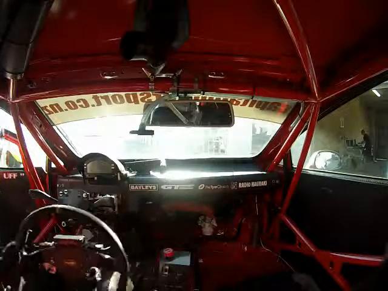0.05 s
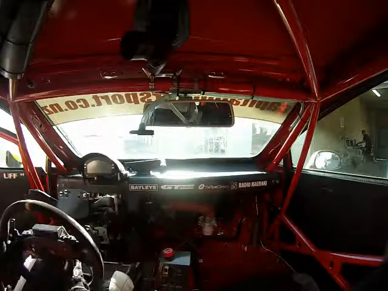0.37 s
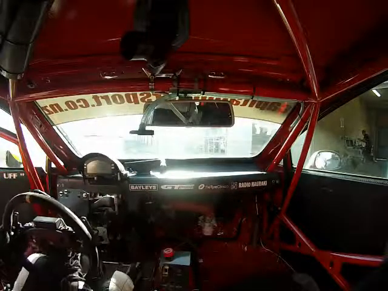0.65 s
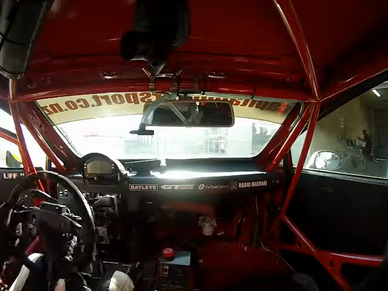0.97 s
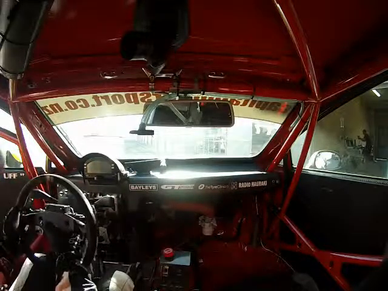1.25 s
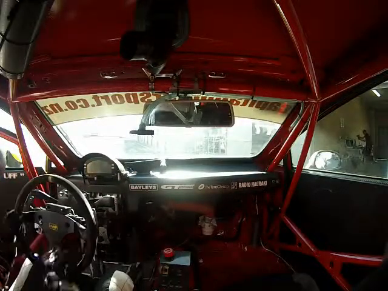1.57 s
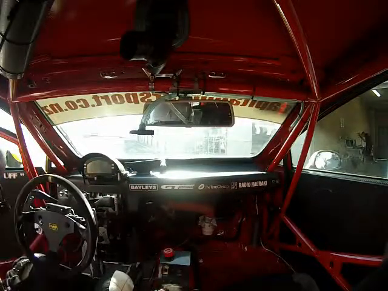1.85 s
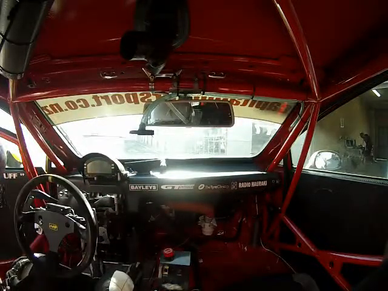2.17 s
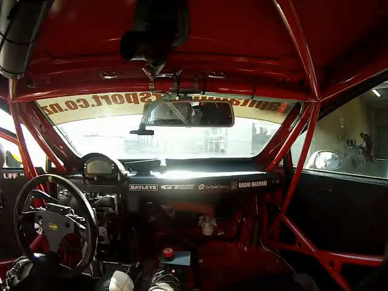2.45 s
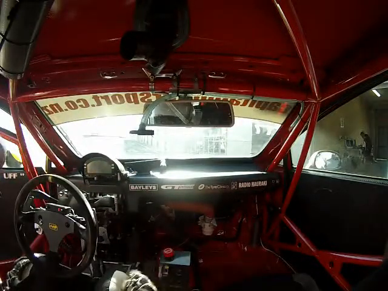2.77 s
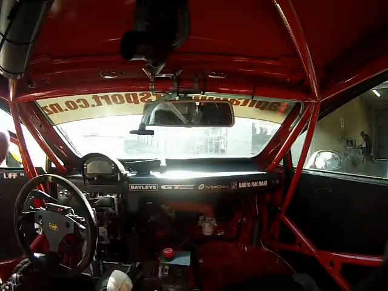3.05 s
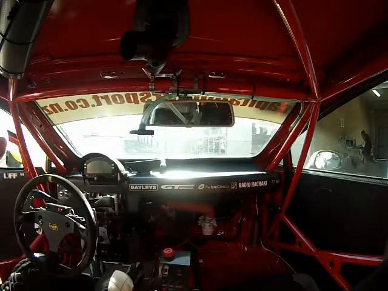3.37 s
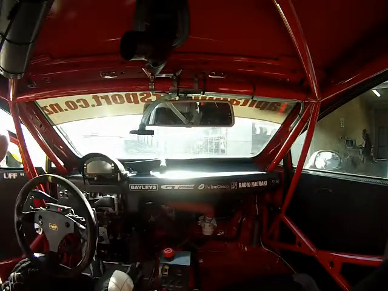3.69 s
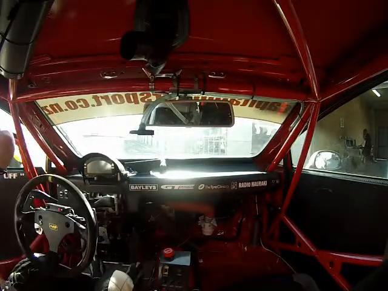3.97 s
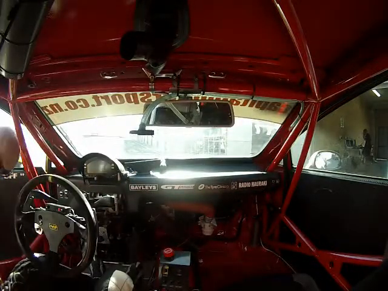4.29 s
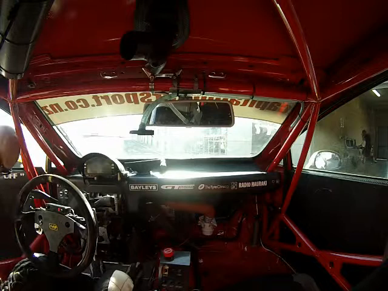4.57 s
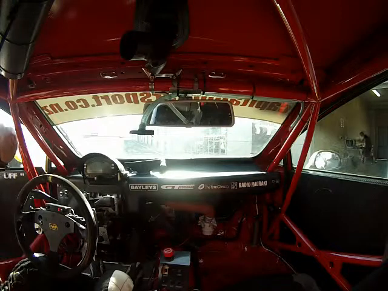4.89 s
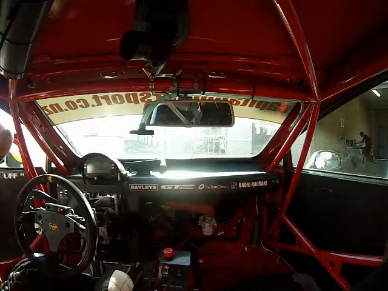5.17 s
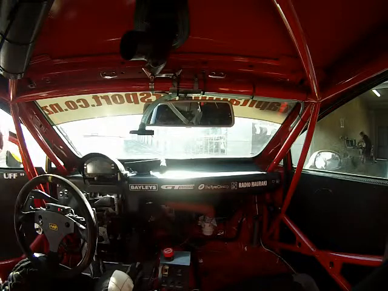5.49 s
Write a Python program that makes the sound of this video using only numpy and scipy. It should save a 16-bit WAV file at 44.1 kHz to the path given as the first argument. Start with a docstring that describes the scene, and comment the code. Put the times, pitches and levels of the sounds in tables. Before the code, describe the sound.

Sharp metal knocks and clicks with hollow, booming thuds in a bare car cabin, then a lull and one ringing clank.

```python
"""Inside a race car parked in a garage, heard from the cabin on an almost mono microphone.
A quick-release steering wheel is knocked onto its column until its collar snaps home; the hollow
column and the bare body shell boom. Fittings click, springs snap, gloves rub the rim, and a last
clank of a lever leaves a thin steel part ringing. The small, hard cabin answers the blows with
short reflections, over the quiet air of the garage outside."""
import sys
import numpy as np
from scipy import signal
from scipy.fft import rfft, irfft
from scipy.io import wavfile
from scipy.ndimage import uniform_filter1d

SR = 44100
rng = np.random.default_rng(int(sys.argv[2]) if len(sys.argv) > 2 else 0)


def transcribe(signal):
    """Save signal, clipped to [-1, 1], as a 16-bit WAV file at the path in sys.argv[1]."""
    frames = np.atleast_2d(signal).T
    limited = np.clip(frames, -1, 1)
    pcm = np.round(limited * 32767).astype(np.int16)
    wavfile.write(sys.argv[1], SR, pcm)


N = 248264
T = np.arange(N) / SR  # scene time [s]
AGE = T[:SR]  # time since a blow [s], one second long


# Hub striking the column: (time [s], relative knock level [dB], relative column level [dB])
HUB_KNOCKS = [(0.315,-31.5,-37.5), (0.737,-15,-58), (0.742,-17,-16.5), (0.78,-19.5,-20.5),
              (0.799,-14.5,-34), (0.808,-21,-19), (0.84,-28.5,-38), (1.111,-7.5,-8), (1.2136,-19.5,-18.5),
              (1.222,-21.5,-23), (1.256,-6.5,-10), (1.265,-14,-15.5), (1.531,-35,-30), (1.62,-29,-13.5),
              (1.632,-17,-17), (2.404,-16.5,-28), (2.436,-15,-30.5)]
# Modes of the hub: (frequency [Hz], level [dB], t60 [s])
HUB_MODES = [(660, -5, .06), (790, -5, .06), (930, -4, .06), (1085, 0, .07), (1160, -2, .05),
             (1290, -4, .05), (1480, -9, .05), (2000, -11, .06), (2260, -6, .06), (2700, -13, .08),
             (3020, -20, .06)]
# Spectrum of the hub's contact: (frequency [Hz], level [dB])
KNOCK_SPECTRUM = [(200, -21.5), (450, -2.5), (1100, 3.5), (1650, -12), (2400, -17.5), (3400, -27),
                  (5000, -63.5)]
def hub_knocks():
    """The hub hunts for its splines: each blow rings it, scrapes steel and shakes column and shell."""
    out = np.zeros(N)
    for s, db, column_db in HUB_KNOCKS:
        hub = cabin(ring(HUB_MODES, scatter_db=0), wet_db=-4, t60=.12)
        hub = confine(hub, low_hz=553, high_hz=3060)
        contact = crack(KNOCK_SPECTRUM, t60=.05, tail_db=-8, tail_t60=.15)
        add(out, s, undb(db - 19) * (hub + contact))
        add(out, s, undb(db - 50) * spline_scrape())
        add(out, s + .00238, undb(column_db - 3) * column())
        thump = confine(ring(SHELL_MODES, scatter_db=2), low_hz=29.8, high_hz=160)
        add(out, s, undb(column_db - 10) * thump)
    return out


# Modes of the steering column: (frequency [Hz], level [dB], t60 [s])
COLUMN_MODES = [(258.95, -0.5, 0.33), (280.6, 0, 0.28), (339.5, -4, 0.12), (390.3, -4.5, 0.16),
                (503.8, -12.5, 0.22), (523.6, -19, 1)]
# Spectrum of the dash's thud: (frequency [Hz], level [dB])
DASH_SPECTRUM = [(120, -10.5), (185, -24.5), (255, -1.5), (350, -3), (450, -10.5), (520, -5.5), (600, -34),
                 (900, -15.5), (2000, -76)]
def column():
    """The hollow note of the column, with the looser thud of the dash around it."""
    note = confine(ring(COLUMN_MODES, scatter_db=2), low_hz=190, high_hz=705)
    thud = crack(DASH_SPECTRUM, t60=.05, tail_db=-13, tail_t60=.33)
    return unit_energy(note + undb(-3.5) * thud)


# Spectrum of steel on steel: (frequency [Hz], level [dB])
SCRAPE_SPECTRUM = [(2000, -12), (3500, 2), (4800, 2.5), (5700, -3), (6600, -2.5), (8000, -8), (10000, -26),
                   (12500, -23.5), (15000, -48)]
def spline_scrape():
    """Steel grazes steel on the splines in a short, bright rasp."""
    return crack(SCRAPE_SPECTRUM, t60=.05, tail_db=7, tail_t60=.15)


# Hands shoving the column: (time of full force [s], hold [s], level [dB])
COLUMN_SHOVES = [(0.0, 0.008, -41.5), (0.193, 0.025, -41), (0.35, 0.082, -40), (0.793, 0.13, -21.5),
                 (1.142, 0.19, -18), (1.433, 0.041, -21.5), (1.645, 0.019, -16.5), (1.85, 0.015, -30.5),
                 (2.25, 0.49, -39.5), (2.986, 0.046, -43.5)]
# Modes of the bare shell around the microphone: (frequency [Hz], level [dB], t60 [s])
SHELL_MODES = [(39.1, 0, 0.61), (54.7, -8, 1), (69.1, 1.5, 0.67), (85, -0.5, 0.57), (108.2, -4, 0.8),
               (144, -10, 0.15)]
def shell_boom():
    """Each shove builds quickly, holds and dies away, keeping the shell booming in its lowest modes."""
    rise_db_per_s, fall_db_per_s = 339.5, 82
    response = confine(ring(SHELL_MODES, scatter_db=1), low_hz=29.5, high_hz=113.7)
    boom = signal.fftconvolve(rng.standard_normal(N + SR - 1), response, "valid")
    boom /= np.sqrt(uniform_filter1d(boom ** 2, size=4000))  # evened out, so the shoves set the level
    force_db = [db - rise_db_per_s * np.maximum(s - T, 0) - fall_db_per_s * np.maximum(T - s - hold, 0)
                for s, hold, db in COLUMN_SHOVES]
    return boom * undb(np.max(force_db, axis=0))


# The collar locking: (time [s], relative crash level [dB], crash t60 [s], ring level [dB],
# hum level [dB], scrape level [dB])
COLLAR_LOCKS = [(1.257, -19.5, 0.059, -62, -34.5, -66), (1.6181, -13.5, 0.1, -30.5, -25.5, -34.5)]
# Spectrum of the collar's crash: (frequency [Hz], level [dB])
CRASH_SPECTRUM = [(450, -15), (750, 5.5), (1130, 9.5), (1500, -1), (2250, 5), (3400, -16.5), (4750, -11.5),
                  (5700, -17.5), (6600, -16), (9500, -26.5), (12000, -35.5), (15000, -51)]
# Modes of the steel collar and of the wheel: (frequency [Hz], level [dB], t60 [s])
COLLAR_MODES = [(1680, -6, .12), (1920, -5, .1), (2239, -4, .11), (2729, -6, .13), (2912, -8, .2),
                (3252, -10, .12), (4716, -8, .12), (5020, -15, .18), (6632, -13, .11), (11570, -20, .09),
                (11740, -18, .09), (11890, -16, .11), (12090, -16, .08), (12810, -23, .08)]
WHEEL_MODES = [(345, 0, 1.1), (536, -15, 1.0)]
def collar_locks():
    """The collar crashes shut, rings brightly and leaves the wheel humming."""
    out = np.zeros(N)
    for s, crash_db, crash_t60, ring_db, hum_db, scrape_db in COLLAR_LOCKS:
        crash = crack(CRASH_SPECTRUM, t60=crash_t60, tail_db=-27, tail_t60=.33)
        add(out, s, undb(crash_db - 7) * crash)
        add(out, s, undb(ring_db) * ring(COLLAR_MODES, scatter_db=2))
        add(out, s, undb(scrape_db) * spline_scrape())
        add(out, s, undb(hum_db) * ring(WHEEL_MODES, scatter_db=0))
    return out


# Small fittings clicking: (time [s], relative click level [dB], relative edge level [dB])
FITTING_CLICKS = [(0.421, -42.5, -71), (1.898, -25, -54), (1.909, -26, -67.5), (1.946, -16.5, -49),
                  (2.357, -20, -77), (2.368, -11, -73), (2.393, -1.5, -40.5), (2.56, -8.5, -41.5),
                  (2.937, -39, -69), (3.054, -40, -58.5), (3.174, -36, -67), (3.211, -41, -59),
                  (4.092, -48, -70), (4.202, -41.5, -75), (4.543, -46.5, -69)]
# Modes of a fitting: (frequency [Hz], level [dB], t60 [s])
FITTING_MODES = [(800, -9, .03), (910, -5, .045), (1120, 0, .035), (1230, 0, .03), (1350, -4, .028),
                 (1650, -13, .02), (2000, -10, .03), (2320, -12, .025), (2700, -21, .03), (3250, -25, .025)]
# Spectrum of a click's bright edge: (frequency [Hz], level [dB])
EDGE_SPECTRUM = [(2000, -26), (3500, 15), (4200, -16), (4900, 2.5), (5600, -18.5), (6250, 4), (7300, -22),
                 (11000, -25.5), (15000, -41)]
def fitting_clicks():
    """Small damped parts clack against their stops; a soft contact has little edge and sounds duller."""
    out = np.zeros(N)
    for s, db, edge_db in FITTING_CLICKS:
        top_hz = np.interp(edge_db, [-72, -52], [1550, 2500])
        clack = cabin(ring(FITTING_MODES, scatter_db=2), wet_db=-3, t60=.12)
        add(out, s, undb(db - 14.5) * confine(clack, low_hz=620, high_hz=top_hz))
        add(out, s, undb(edge_db - 6) * crack(EDGE_SPECTRUM, t60=.015, tail_db=-3, tail_t60=.15))
        add(out, s + .0029, undb(db - 24.5) * column())
    return out


# A lever touching, then hitting its stop: (time [s], level [dB], column level [dB])
LEVER_CLANKS = [(5.2324, -21, -36), (5.2350, -19, -31)]
# Modes of the lever: (frequency [Hz], level [dB], t60 [s])
LEVER_MODES = [(502, -2, .12), (930, -2, .09), (1068, -2, .08), (1274, -1, .06), (1417, 1, .055),
               (1530, -11, .06), (1603, -9, .07), (2225, -15, .08), (2305, -9, .06), (2806, -4, .16),
               (2912, -16, .12), (3170, -18, .06), (3476, -22, .07), (3567, -20, .12), (3915, -22, .05)]
# Spectrum of the lever's contact: (frequency [Hz], level [dB])
CLANK_SPECTRUM = [(500, -17), (900, -3.5), (1400, 5), (1900, -11.5), (2700, 0), (3300, -20), (3900, -29.5),
                  (4400, -37), (5600, -46), (6300, -26.5), (8000, -48.5), (15000, -67)]
def lever_clanks():
    """A steel lever lands hard, ringing briefly and sounding the column."""
    out = np.zeros(N)
    for s, db, column_db in LEVER_CLANKS:
        steel = cabin(ring(LEVER_MODES, scatter_db=2), wet_db=-6, t60=.073)
        steel = confine(steel, low_hz=655, high_hz=4270)
        contact = crack(CLANK_SPECTRUM, t60=.049, tail_db=-11, tail_t60=.17)
        add(out, s, undb(db) * (steel + undb(-7.5) * contact))
        add(out, s, undb(column_db) * column())
    return out


# Spring catches letting go: (time [s], relative tick level [dB], relative body level [dB])
SPRING_SNAPS = [(2.2036, -27.5, -34.5), (2.2342, -44, -38), (2.2423, -34.5, -43.5), (2.589, -34, -32.5),
                (2.591, -26.5, -31.5), (2.7036, -58, -52.5)]
# Spectra of a snap's treble tick and midrange body: (frequency [Hz], level [dB])
TICK_SPECTRUM = [(2000, -31), (3600, -4.5), (4300, -8.5), (5150, 4.5), (6000, -11), (8000, -9.5),
                 (10000, -22), (13000, -28), (15000, -32)]
SNAP_BODY_SPECTRUM = [(150, -26), (300, -4), (700, -11), (1200, 1), (1800, -6), (2300, -1), (3200, -10),
                      (4500, -42.5)]
def spring_snaps():
    """Light springs let go with a bright tick over a longer midrange body."""
    out = np.zeros(N)
    for s, tick_db, body_db in SPRING_SNAPS:
        add(out, s, undb(tick_db - 13) * crack(TICK_SPECTRUM, t60=.017, tail_db=-1, tail_t60=.12))
        add(out, s, undb(body_db - 4) * crack(SNAP_BODY_SPECTRUM, t60=.11, tail_db=8.5, tail_t60=.18))
    return out


# Blows that set a thin steel part singing: (time [s], level [dB])
THIN_STEEL_BLOWS = [(1.257, -58), (2.393, -52.5), (5.237, -41)]
# Modes of that part: (frequency [Hz], level [dB], t60 [s])
THIN_STEEL_MODES = [(2800, 0, .7), (2823, -5, .5), (2710, -12, .9), (1674, -7, .38), (1497, -7, .38),
                    (2110, -18, .47), (3564, -20, .45)]
def singing_steel():
    """A thin steel part sings on after a blow, its two strongest modes close enough to beat."""
    out = np.zeros(N)
    for s, db in THIN_STEEL_BLOWS:
        add(out, s, undb(db) * ring(THIN_STEEL_MODES, scatter_db=.5))
    return out


# Loose steel on the hub: (time [s], pitch [Hz], relative level [dB])
HUB_TINKLES = [(0.78, 4750, -54.5), (0.784, 6180, -64), (0.84, 4710, -65), (1.222, 6800, -65)]
def hub_tinkles():
    """Loose steel tinkles, each touch one high, short mode reflected by the cabin."""
    out = np.zeros(N)
    for s, hz, db in HUB_TINKLES:
        ping = ring([(hz, 0, .05)], scatter_db=0)
        add(out, s, undb(db - 3) * cabin(ping, wet_db=4, t60=.063))
    return out


# Gloves sliding on the rim: (time [s], length [s], level [dB])
GLOVE_RUBS = [(0.125, 0.23, -54), (1.076, 0.057, -47), (1.197, 0.048, -35), (1.33, 0.17, -58),
              (1.897, 0.059, -46.5), (2.348, 0.04, -38.5), (3.92, 0.17, -58.5), (4.44, 0.04, -62),
              (4.69, 0.2, -61.5)]
def glove_rubs(grip):
    """Gloves catch and slip on the rim as the grip varies, stirring the column too."""
    slip = undb(4 * grip) * rng.standard_normal(N)
    rim = unit_rms(band(band(slip, 1090, 300), 1090, 450))
    column_rumble = unit_rms(band(band(slip, 303, 110), 296, 130))
    return (rim + undb(-3.5) * column_rumble) * swells(GLOVE_RUBS)


# The two strokes of a squeak: (time [s], length [s], level [dB])
SQUEAK_STROKES = [(2.822, 0.096, -57), (2.915, 0.2, -57.5)]
def squeak(grip):
    """A faint, wavering squeak starts sharp and sinks to rest; its level flutters with the grip."""
    rest_hz, sharp_hz, settle_s, waver_share = 2150, 228, .065, .016
    elapsed = np.maximum(T - SQUEAK_STROKES[0][0], 0)
    hz = rest_hz + sharp_hz * np.exp(-elapsed / settle_s)
    waver = 1 + waver_share * wander(samples=150)
    tone = np.sin(2 * np.pi * np.cumsum(hz * waver) / SR)
    return undb(2.3 * grip) * tone * swells(SQUEAK_STROKES)


# Spells of faint whirring: (time [s], length [s], level [dB])
WHIR_SPELLS = [(0.92, 0.69, -67), (3.2, 0.65, -68.5)]
def whir():
    """A narrow band of high noise comes and goes."""
    noise = band(band(rng.standard_normal(N), 2790, 220), 2800, 300)
    return unit_rms(noise) * swells(WHIR_SPELLS)


# Spectrum of the garage's air at the microphone: (frequency [Hz], level [dB])
AIR_SPECTRUM = [(22, -21), (40, -4), (62, 6), (95, -4), (130, -10.5), (190, -16), (270, -5.5), (400, -16.5),
                (700, -22.5), (1150, -22), (1800, -27), (4500, -34.5), (10000, -44), (15000, -55)]
def garage_air():
    """Steady air heard through the shell, with a trace of hiss in opposite polarity left and right."""
    air = unit_rms(colour(rng.standard_normal(N), AIR_SPECTRUM, size=16384)) * undb(-49)
    hiss_spectrum = [(100, 2.5), (1500, 2), (7000, 2), (11000, -11), (15000, -16)]
    hiss = unit_rms(colour(rng.standard_normal(N), hiss_spectrum)) * undb(-77.5)
    return air + np.array([[1], [-1]]) * hiss


def cabin(x, wet_db, t60, gap_s=.0015):
    """Direct sound, then crowded reflections from nearby glass and bare panels."""
    echoes = rng.standard_normal(SR) * fade(t60) * np.clip(AGE / gap_s - 1, 0, 1)
    echoes /= np.sqrt(np.sum(echoes ** 2))
    return unit_energy(x + undb(wet_db) * signal.fftconvolve(x, echoes)[:SR])


def ring(modes, scatter_db):
    """Struck modes of alternating sign; their shares vary a little with the point of contact."""
    shares = undb(scatter_db * rng.standard_normal(len(modes)))
    out = np.zeros(SR)
    for k, (hz, db, t60) in enumerate(modes):
        mode = unit_energy(fade(t60) * np.sin(2 * np.pi * hz * AGE))
        out += (-1) ** k * shares[k] * undb(db) * mode
    return unit_energy(out)


def crack(spectrum, t60, tail_db, tail_t60):
    """A contact: a dense burst of short-lived vibration and its tail in the cabin."""
    envelope = fade(t60) + undb(tail_db) * fade(tail_t60)
    return unit_energy(colour(envelope * rng.standard_normal(SR), spectrum))


def confine(x, low_hz, high_hz):
    """Band-pass: a part's size limits the lows it radiates, its contact time the highs."""
    bandpass = signal.butter(3, [low_hz, high_hz], "band", fs=SR, output="sos")
    return unit_energy(signal.sosfilt(bandpass, x))


def colour(x, spectrum, size=4096):
    """Causal filter through the given (frequency [Hz], level [dB]) points."""
    hz, db = np.transpose(spectrum)
    bin_hz = np.fft.rfftfreq(size, 1 / SR)
    gain = undb(np.interp(np.log(bin_hz + 1), np.log(hz), db))
    cepstrum = irfft(np.log(gain))
    cepstrum[1:size // 2] *= 2  # folded onto positive time for minimum phase
    cepstrum[size // 2 + 1:] = 0
    response = irfft(np.exp(rfft(cepstrum)))
    return signal.fftconvolve(x, response)[:len(x)]


def band(x, hz, width_hz):
    """One resonance."""
    return signal.lfilter(*signal.iirpeak(hz, hz / width_hz, fs=SR), x)


def swells(rows):
    """A rounded rise and fall for each (time [s], length [s], level [dB])."""
    return sum(undb(db) * np.sqrt(np.clip(1 - (2 * (T - s) / length - 1) ** 2, 0, 1))
               for s, length, db in rows)


def wander(samples):
    """Random drift at rms 1, smoothed over the given span."""
    return unit_rms(uniform_filter1d(rng.standard_normal(N), size=samples))


def fade(t60):
    """Exponential decay by 60 dB in t60 seconds."""
    return np.exp(-np.log(1000) * AGE / t60)


def undb(db):
    """Decibels to gain."""
    return 10 ** (np.asarray(db) / 20)


def unit_rms(x):
    """Scale to rms 1."""
    return x / np.sqrt(np.mean(x ** 2))


def unit_energy(x):
    """Scale a decaying sound to the energy of 30 ms at rms 1."""
    return x / np.sqrt(np.sum(x ** 2) / (.03 * SR))


def add(track, s, sound):
    """Mix a sound in at time s."""
    start = max(int(s * SR), 0)
    track[start:start + len(sound)] += sound[:N - start]


def scene():
    """The sound in the cabin: all but the hiss reaches both channels alike."""
    wheel = hub_knocks() + hub_tinkles() + fitting_clicks() + spring_snaps() + collar_locks()
    car = lever_clanks() + singing_steel() + shell_boom()
    grip = wander(samples=700)
    return wheel + car + glove_rubs(grip) + whir() + squeak(grip) + garage_air()


def record(dry):
    """The microphone's recorder rounds the highest peaks and cuts the treble above 15 kHz."""
    rounded = np.tanh(.5 * dry) / .5
    return signal.sosfilt(signal.ellip(8, .2, 70, 15000, fs=SR, output="sos"), rounded)


dry = scene()
out = record(dry)
transcribe(out)
```